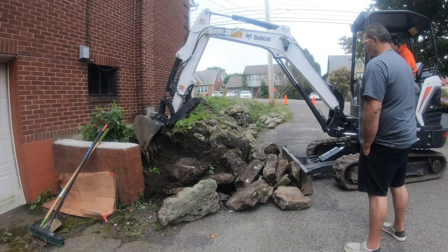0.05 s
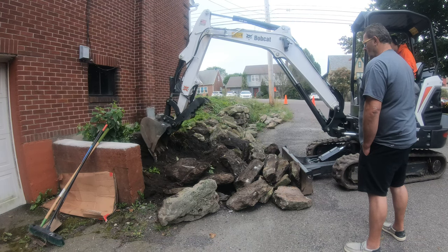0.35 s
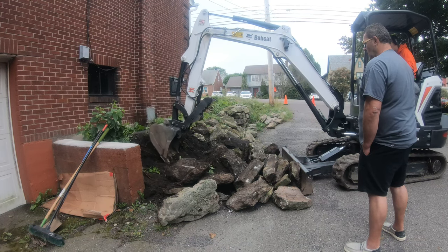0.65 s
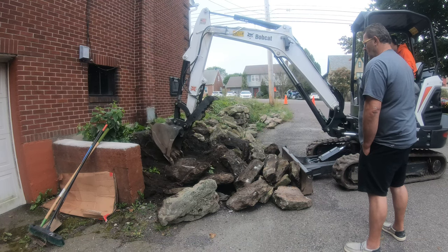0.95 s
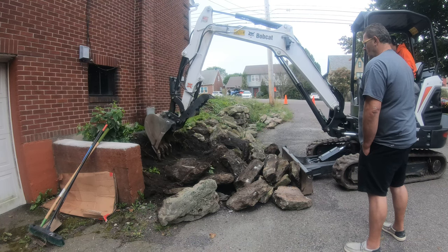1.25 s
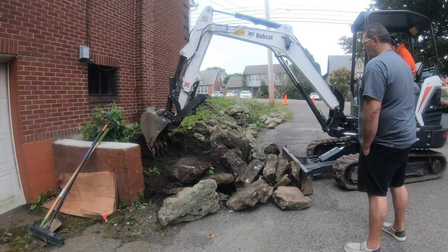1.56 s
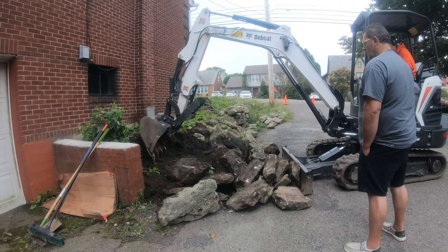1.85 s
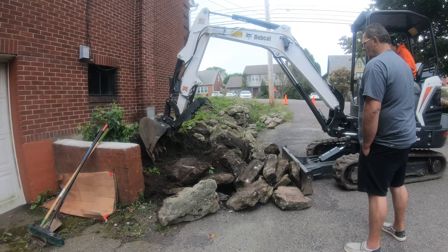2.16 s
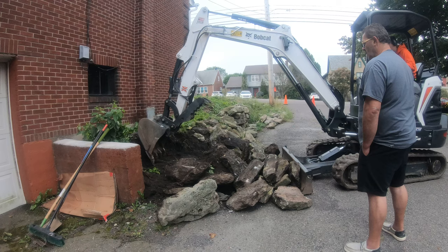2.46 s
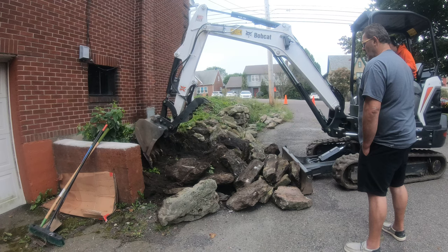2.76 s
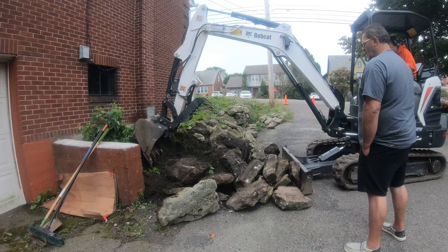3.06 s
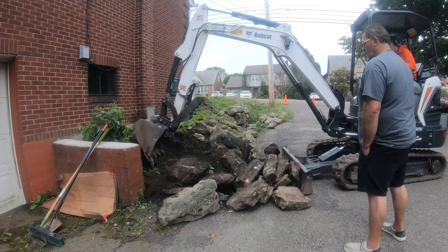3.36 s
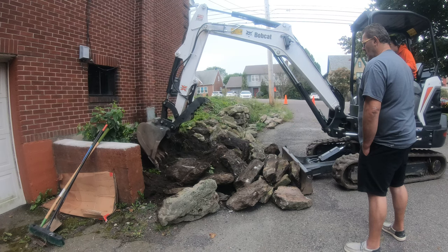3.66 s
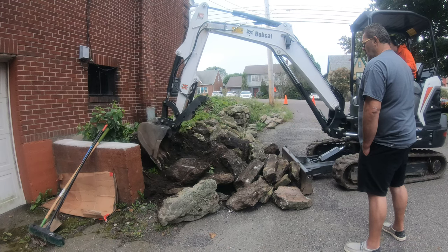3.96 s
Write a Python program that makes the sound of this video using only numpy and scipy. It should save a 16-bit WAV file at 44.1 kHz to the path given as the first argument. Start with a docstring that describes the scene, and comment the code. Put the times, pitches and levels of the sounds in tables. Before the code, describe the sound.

Small digger's diesel engine rumbling outdoors, the bucket grinding and clacking through rocks.

```python
"""First comes the chug of a mini excavator's three-cylinder diesel, with oil hissing in its valves.
A second low engine note slowly sinks and fades. A few metres away, beside a brick wall, the steel
bucket works a heap of stones and soil: it knocks, grinds and squeaks, stones ring and chips snap off.
The teeth tick as the bucket lifts clear, and later heavy stones shift with dull thuds.
The diesel sags under load, and the wall and houses send back a short echo."""
import sys
import numpy as np
from scipy import signal
from scipy.fft import rfft, irfft
from scipy.io import wavfile
from scipy.ndimage import uniform_filter1d

SR = 44100
rng = np.random.default_rng(int(sys.argv[2]) if len(sys.argv) > 2 else 0)


def generate_wav(signal):
    """Clip the signal to [-1, 1] and save it as 16-bit WAV at the path in sys.argv[1]."""
    frames = np.transpose(np.atleast_2d(signal))
    scaled = np.clip(frames, -1, 1) * 32767
    pcm = np.round(scaled).astype(np.int16)
    wavfile.write(sys.argv[1], SR, pcm)


N = 176400
T = np.arange(N) / SR

# how fast the diesel fires (time [s], firing rate [Hz])
FIRING_RATE = [(0,53),(.11,52.4),(.44,52.8),(.73,52),(.85,50.8),(1.11,52.2),(1.35,51.4),(1.69,52.9),(2.32,52.8),(2.52,50.7),(2.64,49),(2.82,51.2),(3.0,52.9),(3.3,53.2),(4,52.4)]
# exhaust tones (multiple of the engine cycle [x], level [dB])
EXHAUST_TONES = [(3,-33),(4,-39.5),(5,-33),(6,-28.5),(7,-42),(8,-46.5),(9,-34),(10,-44.5),(11,-41),(13,-51),(14,-44.5),(15,-41),(16,-46.5),(18,-48.5),(20,-48),(23,-51.5)]
# tone colour of the cooling fan and of the engine din (frequency [Hz], relative level [dB])
FAN_COLOUR = [(150,3.5),(300,4),(600,2),(1200,-1),(2400,-11),(3400,-12),(5000,-18),(7000,-23.5),(10000,-28.5),(11300,-41),(12500,-44),(16000,-71)]
DIN_COLOUR = [(20,-18),(45,-5.5),(75,-1),(120,-6),(210,-10),(320,-37),(700,-17),(1200,-15.5),(2500,-26.5),(5000,-31.5),(8000,-30.5),(11000,-57)]
# loudness of the diesel's drone (time [s], level [dB])
DRONE_LEVEL = [(0,-28.5),(.6,-31.5),(1.2,-33.5),(1.6,-30.5),(2.1,-28.5),(2.65,-28.5),(3.1,-28),(3.6,-26),(4,-27)]
# second engine (time [s], cycle rate [Hz], level [dB])
SECOND_ENGINE = [(0,18.1,-19.5),(.3,18.05,-18.5),(.8,17.95,-21.5),(1.35,17.45,-21),(1.65,17.05,-29),(1.95,16.95,-25),(2.5,16.55,-30),(3.1,16.4,-37),(4,16.4,-38)]
# its tones (multiple of the engine cycle [x], relative level [dB])
SECOND_TONES = [(2,-21),(3,-16.5),(4,-2),(5,-1.5),(6,-13),(7,-5.5),(9,-12.5),(10,-20)]
# oil hiss (time [s], level [dB])
HISS_LEVEL = [(0,-46.5),(.35,-48.5),(.8,-41.5),(1.0,-44.5),(1.25,-44.5),(1.55,-47.5),(1.9,-56),(2.4,-48),(3.3,-55),(4,-49)]
# its tone colour (frequency [Hz], relative level [dB])
HISS_COLOUR = [(1200,-28.5),(2500,-1.5),(3200,7),(4300,-0.5),(5700,-4),(7000,-15.5),(10000,-36),(11500,-37)]
# bucket knocks (time [s], length before fading [s], body [dB], clack [dB], crack [dB])
BUCKET_KNOCKS = [(0.186,0.019,-32,-31.5,-46),(0.243,0.0073,-32.5,-32,-60),(0.363,0.014,-18.5,-28.5,-33),(0.432,0.0075,-19,-29,-34),(0.522,0.0063,-38,-25,-39.5),(0.604,0.011,-27.5,-31,-39),(0.69,0.019,-37,-23.5,-41),(0.703,0.0055,-36,-26,-32.5),(0.744,0.037,-22.5,-27,-41),(0.777,0.01,-21,-25,-28.5),(.788,.008,-28,-43,-41),(0.811,0.0093,-38,-28,-28),(0.852,0.0096,-23.5,-21.5,-24.5),(0.88,0.01,-31,-29,-34),(0.948,0.011,-25,-29,-37),(1.028,0.007,-26.5,-35,-62),(1.206,.005,-32,-42,-46),(1.241,0.017,-32.5,-37,-49),(1.474,0.02,-33.5,-40.5,-60),(1.686,0.0096,-35,-40,-58),(2.187,0.0059,-41,-31,-43),(2.354,0.012,-32,-31,-47),(2.501,0.0088,-35,-27,-43.5),(2.598,0.0098,-23,-19.5,-29.5),(2.626,.012,-28.5,-20,-25),(2.647,.008,-48,-30,-33),(2.715,0.013,-20.5,-29,-33.5),(2.735,0.022,-27,-20,-34.5),(2.772,0.034,-32,-27,-47),(2.824,0.011,-22,-26.5,-40),(2.915,0.0068,-53,-31.5,-43),(2.972,0.0088,-54,-34,-44),(2.988,0.01,-44,-30,-60),(3.135,0.016,-25.5,-30.5,-45.5),(3.391,0.0057,-36,-26,-41.5),(3.434,.01,-33,-29,-44),(3.472,0.013,-26.5,-34,-50),(3.512,0.014,-38,-22,-33.5),(3.535,.02,-29,-18.5,-30.5),(3.601,0.0093,-21.5,-22.5,-32),(3.626,0.018,-30,-28,-34.5),(3.762,0.02,-32,-31.5,-61),(3.795,0.0067,-27,-32,-53),(3.82,0.011,-28,-31,-42),(3.884,0.0061,-38,-26,-37.5)]
# steel on stone: low body, middle clack, high crack (frequency [Hz], relative level [dB])
BODY_COLOUR = [(150,-20),(290,-4),(400,-2.5),(510,-3),(680,3),(850,-2.5),(1050,-1),(1400,-7),(2200,-9.5),(4000,-57.5)]
CLACK_COLOUR = [(600,-32),(1100,-4.5),(1600,-1.5),(2100,1.5),(2700,0.5),(3300,-1),(3900,-3),(4600,-17.5),(7000,-40.5),(11000,-59.5),(16000,-75)]
CRACK_COLOUR = [(2500,-12.5),(4200,7),(5200,3),(6500,1.5),(8000,-5),(10000,-16),(11300,-32.5),(12500,-30),(14000,-37),(16000,-46)]
# ringing tones of the bucket (pitch [Hz], level [dB], time to fade by 60 dB [s])
SHELL_TONES = [(398,2.5,.12),(638,-1.5,0.17),(745,-6.5,0.3),(874,-8.5,.25),(1004.5,1,0.2),(1080,-6,0.14),(1634,1,0.17),(2073,1.5,0.3),(2715,5.5,0.22),(3320,5,.22),(3781,4,0.17),(4260,3,0.23),(5010,5,0.22),(5880,1,.3)]
# struck stones (time [s], pitch [Hz], level [dB])
STONE_HITS = [(0.367,828,-21),(.368,580,-19.5),(.370,1036,-23),(.434,1004,-22.5),(.778,2040,-25),(.778,673,-27),(.792,749,-16),(.822,1760,-28),(0.863,1330,-24),(2.354,2300,-30),(2.503,1894,-32),(2.597,3766,-19),(2.599,2063,-22),(2.625,360,-26.5),(2.630,2640,-21),(2.648,2315,-23),(2.747,2060,-22.5),(2.755,2880,-26),(2.779,2200,-23),(2.825,2764,-28.5),(2.916,2200,-30),(2.974,3790,-33.5),(3.139,2416,-29.5),(3.142,848,-30),(3.540,3320,-21.5),(3.542,1585,-25),(3.544,848,-23.5),(3.612,636,-21.5),(3.627,3560,-22.5),(3.884,2010,-33)]
# tones of each stone (multiple of its pitch [x], relative level [dB])
STONE_TONES = [(1,-1),(1.29,-8.5),(1.71,-13)]
# teeth dragging over stone, one list per stroke (time [s], low grinding [dB], rasp [dB])
DRAG_STROKES = [
    [(.37,-38,-22),(.45,-27.5,-37),(.5,-28,-42),(.61,-32.5,-38),(.71,-32,-45),(.78,-28,-24.5),(.89,-25.5,-26.5),(.97,-29,-32),(1.08,-44,-40.5)],
    [(2.44,-38.5,-45),(2.57,-28.5,-38),(2.63,-31,-25.5),(2.69,-29.5,-28.5),(2.75,-27,-23.5),(2.83,-29,-32.5),(2.89,-39,-39),(3.03,-51,-60)],
    [(3.37,-35.5,-45),(3.47,-35.5,-32),(3.56,-21.5,-37),(3.63,-30.5,-24),(3.67,-33.5,-40),(3.73,-30,-34.5),(3.78,-27,-37),(3.86,-36,-45),(3.92,-31.5,-42),(4,-51,-49)],
]
# chips snapping off (time [s], level [dB])
CHIP_SNAPS = [(.372,-42),(0.785,-27.5),(0.856,-24),(2.599,-39),(2.631,-40),(3.604,-26.5),(3.884,-49)]
# their tone colour (frequency [Hz], relative level [dB])
SNAP_COLOUR = [(1500,-15),(3500,6),(7000,-1),(10000,1.5),(11500,-14),(16000,-16)]
# squeaks and groans of steel on stone (time [s], length [s], pitch [Hz], level [dB])
STEEL_SQUEAKS = [(0.45,0.27,400,-31.5),(.605,0.047,2270,-37),(0.815,0.038,5100,-37),(.93,.06,5880,-43),(2.987,0.053,2230,-39),(3.42,0.19,389,-30),(3.453,0.056,1630,-31.5),(3.46,0.049,2115,-36),(3.676,0.077,648.5,-29),(3.699,.11,402,-29.5),(3.747,0.067,1656,-35.5)]
# a tooth catching (time [s], pitch [Hz], level [dB])
TOOTH_TICKS = [(1.065,3130,-29),(1.092,3270,-31),(1.123,3160,-28.5),(1.147,3000,-28),(1.179,5450,-26.5),(1.204,3470,-26),(1.229,3290,-34),(1.318,3200,-33.5),(1.378,3470,-35)]
# heavy stones shifting (time [s], length [s], level [dB])
SOIL_THUDS = [(2.587,0.25,-28),(3.4,0.455,-25.5)]

RISE_S = .0015  # time for a knock or ring to reach full strength
OPPOSITE_SIDES = np.array([[1], [-1]])  # flipping the right channel makes a sound wide


def undb(db):
    """Turn decibels into a gain."""
    return 10 ** (np.asarray(db) / 20)


def unit(x):
    """Scale to an average power of 1."""
    return x / np.sqrt(np.mean(x ** 2))


def curve(rows, column=1, **ends):
    """Join one column of a table with straight lines in time."""
    rows = np.array(rows)
    return np.interp(T, rows[:, 0], rows[:, column], **ends)


def wander(rate_hz):
    """Drift between random values, about 1 in size."""
    step = max(int(SR / rate_hz), 2)
    count = N // step + 2
    return np.interp(T, np.arange(count) * step / SR, rng.standard_normal(count))


def colour(x, points):
    """Shape the tone through (frequency [Hz], level [dB]) points; white noise keeps its power."""
    size = 2 * N
    hz, db = np.array(points).T
    bin_hz = np.arange(N + 1) * SR / size
    gain = unit(undb(np.interp(np.log(bin_hz + 1), np.log(hz), db)))
    # fold the filter so that it rings only after a click, never before
    cepstrum = irfft(np.log(gain))
    cepstrum[1:N] *= 2
    cepstrum[N + 1:] = 0
    return irfft(rfft(x, size) * np.exp(rfft(cepstrum)))[..., :N]


def grit(per_second, spread_db):
    """Random clicks of uneven size."""
    size = undb(spread_db * np.minimum(rng.exponential(size=N), 4))
    return unit((rng.random(N) < per_second / SR) * size * rng.choice([-1, 1], N))


def crackle(per_second, even_s=.012):
    """Separate clicks whose power stays even from moment to moment."""
    clicks = grit(per_second, spread_db=2.5)
    power = uniform_filter1d(clicks ** 2, int(even_s * SR))
    return unit(clicks / np.sqrt(np.abs(power) + 1e-3))


def bursts(events, decay_s=.0027):
    """A tiny puff of noise for each row; the row starts with its time and ends with its level."""
    force = sum(undb(db) * (T >= start) * np.exp(-np.abs(T - start) / decay_s)
                for start, *_, db in events)
    return force * rng.standard_normal(N)


def ring(start, hz, db, decay_s):
    """One tone that dies away."""
    age = np.maximum(T - start, 0)
    envelope = np.minimum(age / RISE_S, 1) * np.exp(-age / decay_s)
    return np.sqrt(2) * undb(db) * envelope * np.sin(2 * np.pi * hz * age)


def engine_tones(cycle_hz, table, rough, smear):
    """Slightly unsteady tones, keyed by multiple; the silencer smears them over the engine cycle."""
    angle = 2 * np.pi * (np.cumsum(cycle_hz) / SR + rng.random())
    tones = {}
    for k, db in table:
        strength = np.sqrt(2) * undb(db) * (1 + rough * wander(18))
        tones[k] = strength * np.sin(k * angle + np.pi * k * k * smear)
    return tones


def exhaust(free_hz=52.5, swell_db_per_hz=2.1):
    """The diesel hums and rumbles; its three cylinders each fire once per cycle."""
    firing_hz = curve(FIRING_RATE)
    tones = engine_tones(firing_hz / 3, EXHAUST_TONES, rough=.1, smear=1 / 3)
    # the tone at twice the firing rate swells as the speed sags
    tones[6] *= undb(swell_db_per_hz * np.maximum(free_hz - firing_hz, 0))
    rumble = colour(rng.standard_normal(N), [
        (15, -57), (30, -32), (50, 2), (90, 3), (170, 3.5), (260, 4.5), (400, -9), (900, -62)])
    return sum(tones.values()) + undb(-35.5) * rumble


def clatter():
    """Burning fuel makes one rattling pulse per firing, each a little different in strength."""
    firings = np.cumsum(curve(FIRING_RATE)) / SR
    strength = undb(1.5 * rng.standard_normal(400))[firings.astype(int) % 400]
    pulses = unit(strength * np.exp(-(firings % 1) / .68))
    return undb(-38.5) * colour(pulses * crackle(9000), [
        (120, -12.5), (280, 2), (450, 4.5), (700, 1.5), (1100, -4.5), (1700, -5),
        (2500, -10), (3500, -19.5), (5000, -23.5), (8000, -27), (11000, -55)])


def fan():
    """The cooling fan's steady rush, mostly the same in both ears."""
    air = .5 * rng.standard_normal((2, N)) + rng.standard_normal(N)
    return undb(-38.5) * colour(air, FAN_COLOUR)


def drone():
    """A strong tone at four times the firing rate, swelling as the arm works."""
    angle = 2 * np.pi * (np.cumsum(4 * curve(FIRING_RATE)) / SR + rng.random())
    return np.sqrt(2) * undb(curve(DRONE_LEVEL) + .85 * wander(27.2)) * np.sin(angle)


def din():
    """A steady wash of engine noise coming back from the sides."""
    return undb(-37) * colour(rng.standard_normal(N), DIN_COLOUR) * OPPOSITE_SIDES


def second_engine():
    """A lumpy low engine note that sinks and fades."""
    tones = engine_tones(curve(SECOND_ENGINE), SECOND_TONES, rough=.13, smear=1 / 5)
    return sum(tones.values()) * undb(curve(SECOND_ENGINE, column=2))


def oil():
    """Oil rushes through the valves with a fluttering hiss."""
    level_db = curve(HISS_LEVEL) + 2.3 * wander(50)
    return undb(level_db) * colour(rng.standard_normal(N), HISS_COLOUR)


def knocks(decay_s, column):
    """Each knock crushes the stone in a short crackle that dies away."""
    power = np.zeros(N)
    for row in BUCKET_KNOCKS:
        start, length = row[:2]
        age = np.maximum(T - start, 0)
        envelope = np.minimum(age / RISE_S, 1) * np.exp(-np.maximum(age - length, 0) / decay_s)
        power += (undb(row[column]) * envelope) ** 2
    return np.sqrt(power) * crackle(2600)


def drags(slips_per_second, judder_db, column):
    """The teeth stick and slip over stone in uneven fits."""
    force = sum(undb(curve(stroke, column, left=-120, right=-120)) for stroke in DRAG_STROKES)
    return force * crackle(slips_per_second) * undb(judder_db * wander(90))


def contact():
    """Teeth knock and scrape on stone, heard as a low body, a middle clack and a high crack."""
    rasp = drags(1300, judder_db=2.25, column=2)
    grinding = drags(1200, judder_db=1.1, column=1)
    body = colour(knocks(decay_s=.013, column=2) + grinding, BODY_COLOUR)
    clack = colour(knocks(decay_s=.011, column=3) + rasp, CLACK_COLOUR)
    crack = colour(knocks(decay_s=.009, column=4) + undb(-11.5) * rasp, CRACK_COLOUR)
    return undb(-1.5) * body + undb(-2) * clack + crack


def bucket():
    """The contact is heard directly, scatters off the heap and wall, and rings the steel shell."""
    direct, scattered = contact(), contact()
    t = T[:SR]
    shell = np.zeros(SR)
    for hz, db, fade_s in SHELL_TONES:
        damping = np.log(1000) / fade_s
        shell += undb(db) * 2 * damping / SR * np.exp(-damping * t) * np.cos(2 * np.pi * hz * t)
    ringing = signal.fftconvolve(scattered, shell)[:N]
    return direct + undb(-14.5) * scattered * OPPOSITE_SIDES + ringing


def stones():
    """A struck stone clicks, then rings: big ones hollow and longer, small ones with a brief clink."""
    rings = sum(ring(start, hz * ratio, db + tone_db, decay_s=.021 * np.sqrt(1000 / (hz * ratio)))
                for start, hz, db in STONE_HITS for ratio, tone_db in STONE_TONES)
    return rings + undb(-5) * colour(bursts(STONE_HITS), CLACK_COLOUR)


def snaps():
    """Chips break off with short, bright cracks."""
    return colour(bursts(CHIP_SNAPS), SNAP_COLOUR)


def squeaks(rough=.025, waver=.015):
    """Slipping steel makes short tones with a shaky pitch."""
    angle_per_hz = 2 * np.pi * np.cumsum(1 + rough * wander(900) + waver * wander(40)) / SR
    sound = np.zeros(N)
    for start, length, hz, db in STEEL_SQUEAKS:
        swell = np.sin(np.pi * np.clip((T - start) / length, 0, 1))
        sound += np.sqrt(2) * undb(db) * swell * np.sin(hz * angle_per_hz)
    return sound


def ticks():
    """A tooth catches as the bucket lifts clear: each time a tiny crack and a brief ring."""
    cracks = colour(bursts(TOOTH_TICKS),
                    [(500, -4), (3000, 3.5), (6000, -10), (10000, -29), (13000, -42)])
    rings = sum(ring(start, hz, db, decay_s=.003) for start, hz, db in TOOTH_TICKS)
    return undb(-1) * cracks + rings


def thuds():
    """Heavy stones roll dully in the soil, each swelling and fading in a rounded arch."""
    force = sum(undb(db) * np.sqrt(np.maximum(1 - (2 * (T - start) / length - 1) ** 2, 0))
                for start, length, db in SOIL_THUDS)
    return force * colour(grit(200, spread_db=1.4), [
        (20, -18), (45, 0), (100, 1), (180, 0), (280, -6), (400, -4), (600, -9), (1500, -63)])


def echo(fade_s, delay_s=.004):
    """A blur of reflections, different in each ear, that falls 60 dB in fade_s."""
    t = T[:SR]
    envelope = np.exp(-np.log(1000) * t / fade_s) * (t > delay_s)
    return unit(rng.standard_normal((2, SR)) * envelope) / np.sqrt(SR)


def yard(x):
    """Add quick reflections from the wall and a longer, duller echo from the houses."""
    houses = signal.sosfilt(signal.butter(1, 4500, fs=SR, output="sos"), echo(fade_s=.33))
    wall = echo(fade_s=.069)
    return x + signal.fftconvolve(x, undb(-8.5) * wall + undb(-9.5) * houses, axes=1)[:, :N]


def scene():
    """Mix the engines and the digging; the sharper sounds echo round the yard."""
    engines = exhaust() + fan() + drone() + din() + second_engine()
    work = yard(clatter() + oil() + bucket() + stones() + snaps() + squeaks() + ticks())
    balance = undb([[-.15], [.15]])  # a touch louder on the right
    return (engines + work + thuds()) * balance


def record(dry):
    """Cut the highest treble, above 15800 Hz."""
    return signal.sosfilt(signal.ellip(8, .2, 70, 15800, fs=SR, output="sos"), dry)


dry = scene()
out = record(dry)
generate_wav(out)
```